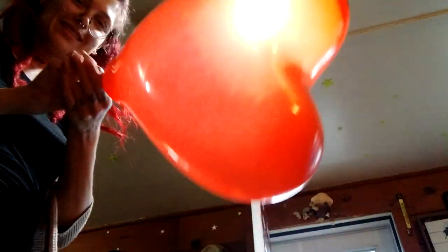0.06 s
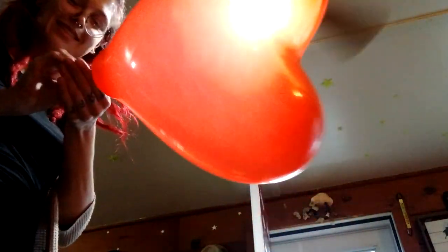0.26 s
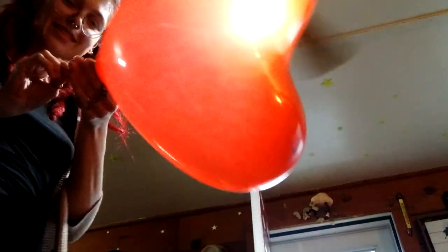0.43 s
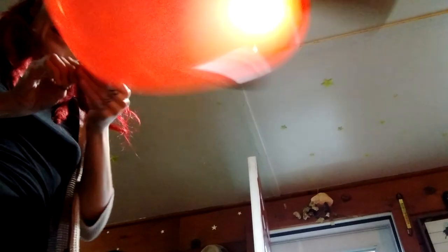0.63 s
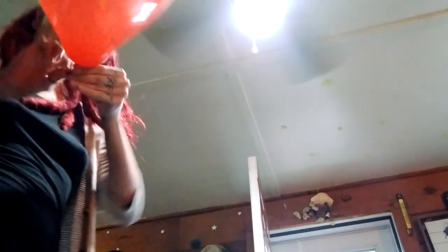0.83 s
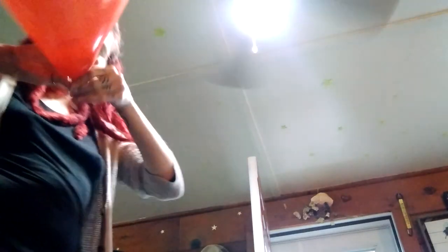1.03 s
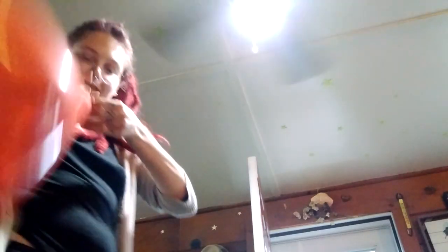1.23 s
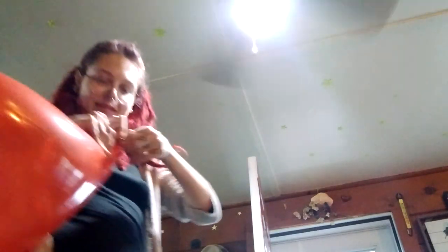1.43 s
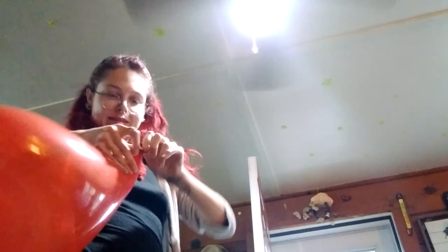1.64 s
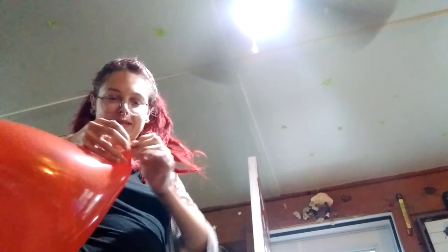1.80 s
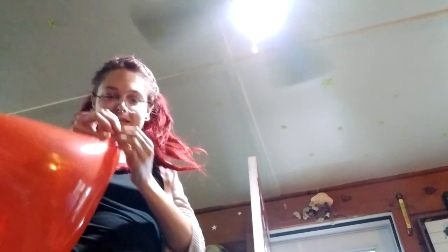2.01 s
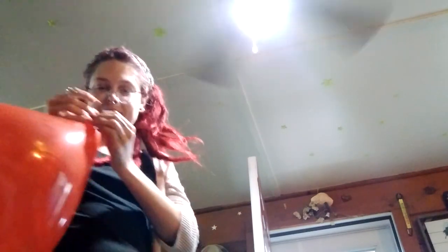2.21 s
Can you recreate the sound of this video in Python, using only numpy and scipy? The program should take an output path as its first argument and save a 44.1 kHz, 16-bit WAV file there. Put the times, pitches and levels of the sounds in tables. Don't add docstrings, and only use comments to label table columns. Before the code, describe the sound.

Close, dry balloon handling: an early squeak, quiet scrapes and a puff of leaking air, soft low thuds with a bright snap midway, then crackling rubber creaks and thin whines, over a very faint fan hum.

```python
import sys
import numpy as np
from scipy import signal
from scipy.fft import rfft, irfft, next_fast_len
from scipy.io import wavfile

SR = 44100
rng = np.random.default_rng(int(sys.argv[2]) if len(sys.argv) > 2 else 0)


def inscribe(sig):
    pcm = np.round(np.clip(np.atleast_2d(sig).T, -1, 1) * 32767)
    wavfile.write(sys.argv[1], SR, pcm.astype(np.int16))


def makeup_ratio(level_db):
    decades = np.asarray(level_db, float) / 20
    return 10 ** decades


N = 99754


def rms_one(x):
    return x / np.sqrt(np.mean(x ** 2) + 1e-20)


def drift(rate):
    r = np.exp(-80 * np.pi * rate / SR)
    points = rng.standard_normal(N // 40 + 1002)
    slow = signal.lfilter([1], [1, -2 * r, r * r], points)[1000:]
    return np.interp(np.arange(N) / 40, np.arange(len(slow)), rms_one(slow))


def stroke(start, rise, hold, db, fall):
    t = np.arange(N) / SR - start
    swell = np.clip(t / max(rise, 1e-4), 0, 1) ** 2
    return swell * makeup_ratio(db - fall * np.clip(t - rise - hold, 0, 1))


def band_pass(x, low, high):
    return signal.sosfilt(signal.butter(2, [low, high], "band", fs=SR, output="sos"), x)


def resonate(x, hz, width_hz):
    r = np.exp(-np.pi * width_hz / SR)
    top = [(1 - r * r) / 2, 0, (r * r - 1) / 2]
    bottom = [1, -2 * r * np.cos(2 * np.pi * hz / SR), r * r]
    return signal.lfilter(top, bottom, x + 1e-18)


def body(x):
    # (f/Hz, width/Hz, level/dB)
    modes = [(242.3, 42.5, 1.5), (496, 106, 5.5), (715, 440, -9), (1110, 73, 0.5), (1332, 310, -7.5),
             (2000, 530, 2), (2588, 590, -3), (3960, 580, 3.5)]
    out = makeup_ratio(-9) * x
    for k, (hz, width_hz, db) in enumerate(modes):
        out = out + (-1) ** k * makeup_ratio(db) * resonate(x, hz, width_hz)
    return out


def coloured(spectrum, alike, patchy_db):
    out, white = 0, rng.standard_normal((2, 2, N))
    grain = makeup_ratio(6 * rng.standard_normal(N))
    hz, db = np.transpose(spectrum)
    edges = np.geomspace(hz[0], hz[-1] * 1.1, 14)
    for k, (low, high) in enumerate(zip(edges, edges[1:])):
        mid, side = band_pass(grain * white[k % 2], low, high)
        band_db = np.interp(np.log(low * high) / 2, np.log(hz), db)
        gain = makeup_ratio(band_db + patchy_db * drift(26.4))
        out = out + gain * (np.sqrt(1 + alike) * mid + np.sqrt(1 - alike) * side * [[1], [-1]])
    return rms_one(out)


def hiss(strokes, colour):
    loudness = np.sqrt(sum(stroke(*row) ** 2 for row in strokes))
    return loudness * coloured(colour, 0.057, 2)


def tone(path, orders, wobble, flutter_db):
    s, hz, db = np.transpose(path)
    t = np.arange(N) / SR
    pitch = np.interp(t, s, hz) * (1 + wobble * drift(60))
    phase = 2 * np.pi * np.cumsum(pitch) / SR
    edge = np.clip(np.minimum(t - s[0], s[-1] - t) / 0.0011, 0, 1)
    stack = 0
    for k, order_db in orders:
        flutter = flutter_db * np.sqrt(k) * drift(50)
        stack = stack + makeup_ratio(order_db + flutter) * np.sin(k * phase + k * k)
    return np.sqrt(2) * edge * makeup_ratio(np.interp(t, s, db)) * stack


def background():
    # (f/Hz, level/dB per Hz)
    floor = [(25, -15), (60, -3.5), (200, -10), (520, -13), (1400, -18.5), (4000, -42), (9500, -22),
             (16000, -23)]
    hum_hz, hum_db = 120, -80.5
    t = np.arange(N) / SR
    hum = makeup_ratio(hum_db + 1.5 * drift(2.9)) * np.sin(2 * np.pi * hum_hz * t + 0.5 * drift(12))
    return makeup_ratio(-80.5) * coloured(floor, 0.34, 1.5) + np.sqrt(2) * hum


def squeak():
    # (t/s, f/Hz, level/dB)
    path = [
        (.058, 399.7, -56.5),
        (.066, 408.8, -50),
        (.074, 349, -51),
        (.085, 358, -47.5),
        (.1, 371.4, -39.5),
        (.124, 370.7, -40),
        (.141, 352, -40),
        (.15, 337.5, -50),
        (.2, 316, -69),
    ]
    # (multiple, level/dB)
    orders = [(1, -3), (2, -16.5), (3, -23.5), (4, -16.5), (5, -26), (6, -29.5), (7, -26), (8, -35),
              (9, -37), (10, -54)]
    return tone(path, orders, wobble=.006, flutter_db=1.2)


def rubs():
    # (start/s, hold/s, level/dB, centre f/Hz, spread/octaves)
    rough = [(0.074, 0.035, -54, 1290, 1), (0.135, 0.012, -52.5, 524, 1.2),
             (0.308, 0.03, -73.5, 1400, 0.44), (0.378, 0.021, -66, 1490, 0.32),
             (0.523, 0.027, -66, 1750, 0.36), (0.559, 0.0017, -55, 1390, 1.9),
             (0.577, 0.077, -53.5, 790, 0.69), (.7, 0.027, -67.5, 870, 0.5), (0.872, 0.026, -54, 477, 1.62),
             (1.004, 0.074, -68, 433, 1.2), (1.082, 0.048, -54, 1850, 1.46),
             (1.165, 0.019, -61, 1170, 1.46), (1.266, 0.013, -48.5, 2560, 1.06),
             (1.279, 0.0045, -50.5, 890, 0.31), (1.291, 0.05, -54, 234, 1),
             (1.294, 0.041, -54.5, 1190, 0.83), (1.347, 0.032, -54, 750, 0.89),
             (1.427, 0.033, -76.5, 985, 0.63), (1.486, 0.033, -62.5, 427, 0.62),
             (1.53, 0.002, -53, 980, 1.13), (1.544, 0.023, -57.5, 696, 0.97),
             (1.665, 0.0098, -55.5, 2000, 0.64), (1.813, 0.014, -46, 1280, 0.7),
             (1.923, 0.058, -46, 1130, 1.34), (1.995, 0.022, -50.5, 860, 0.47),
             (2.063, 0.018, -47.5, 2110, 1.14), (2.102, 0.035, -60, 790, 1.3),
             (2.14, 0.074, -58.5, 750, 1.7), (2.175, 0.0052, -55.5, 825, 1.47)]
    attack_s, fall_db_per_s, longest_s = .007, 500, .3
    slips_per_s, jitter, size_spread_db = 240, .3, 3
    grip_db = -41
    out, scrape = np.zeros(N), .45 * rng.standard_normal(N)
    for s, hold, db, hz, octaves in rough:
        waits = np.exp(jitter * rng.standard_normal(200)) / slips_per_s
        times = s + attack_s + np.cumsum(waits) - waits[0]
        at = (times * SR).astype(int)
        at = at[at < (s + longest_s) * SR]
        sizes = rms_one(makeup_ratio(size_spread_db * rng.standard_normal(len(at))))
        slips = scrape * makeup_ratio(max(grip_db - db, 0))
        slips[:int(s * SR)] = 0
        slips[int((s + longest_s) * SR):] = 0
        inside = at < N
        slips[at[inside]] += np.sqrt(SR / slips_per_s) * sizes[inside]
        low, high = hz / 2 ** octaves, min(hz * 2 ** octaves, SR / 3)
        patch = band_pass(slips, low, high + 10)
        out += rms_one(patch) * stroke(s, attack_s, hold, db - 8.5, fall_db_per_s)
    return body(out)


def slides():
    # (start/s, rise/s, hold/s, level/dB, fall/dB per s)
    glides = [(0.135, 0.023, 0.028, -58.5, 316), (.311, 0.0043, 0.01, -63, 198),
              (.34, 0.033, 0.032, -63.5, 248), (.722, 0.013, 0.0015, -61.5, 703),
              (0.867, 0.023, 0.0026, -50.5, 264), (.997, 0.0049, 0.0043, -56, 216),
              (1.037, 0.0096, 0.14, -61, 233), (1.106, 0.0028, 0.015, -43.5, 259),
              (1.254, 0.033, 0.12, -50.5, 83), (1.504, 0.005, 0.093, -54.5, 216),
              (1.664, 0.0046, 0.0023, -48.5, 277), (1.799, 0.038, 0.084, -54, 211),
              (1.913, 0.063, 0.076, -46.5, 81), (2.084, 0.04, 0.081, -52.5, 356)]
    # (f/Hz, level/dB per Hz)
    colour = [(2000, -9.5), (4500, -12.5), (6500, -2), (8500, 1), (10000, 5), (11500, -6), (13000, -10),
              (16000, -10.5)]
    return hiss(glides, colour)


def snaps():
    # (t/s, peak level/dB)
    bursts = [(.177, -45), (.892, -41), (.998, -55), (1.1102, -20.5), (1.1138, -27), (1.278, -42),
              (1.343, -36), (1.508, -46), (1.527, -46), (1.671, -44), (2.216, -44)]
    size = 400
    x, t = np.zeros(N + size), np.arange(size) / SR
    for s, db in bursts:
        burst = rng.standard_normal(size) * np.exp(-t / 0.0011)
        at = int(s * SR)
        x[at:at + size] += makeup_ratio(db + 8) * rms_one(burst) / 4
    return resonate(x[:N], 10200, 1270)


def leaks():
    # (start/s, rise/s, hold/s, level/dB, fall/dB per s)
    puffs = [
        (.501, 0.0063, 0.039, -51.5, 203),
        (.52, 0.029, 0.07, -46.5, 225),
    ]
    # (f/Hz, level/dB per Hz)
    colour = [(2500, -48), (5000, -38), (7000, -24), (8500, -9), (10000, 0), (11500, -9), (13500, -17),
              (16000, -21)]
    return hiss(puffs, colour)


def bumps():
    # (t/s, level/dB, f/Hz, time to fall 60 dB/s)
    pushes = [
        (0.512, -71.5, 55.5, 0.18),
        (0.882, -35, 76, 0.025),
        (0.898, -60.5, 46.2, 0.34),
        (0.928, -57.5, 120, 0.084),
        (1.017, -55, 68, 0.15),
        (1.033, -55.5, 70.6, 0.27),
        (1.285, -55.5, 113, 0.2),
        (1.296, -52.5, 51, 0.27),
        (1.334, -57, 72, 0.12),
        (1.37, -65, 42, 0.14),
    ]
    out, t = np.zeros(N), np.arange(N) / SR
    for s, db, hz, t60 in pushes:
        u = np.clip(t - s, 0, 9)
        soft_start = 1 - np.exp(-u / .005)
        out += makeup_ratio(db - 60 * u / t60) * soft_start * np.sin(2 * np.pi * hz * u) * 2
    return out


def gushes():
    # (start/s, rise/s, hold/s, level/dB, fall/dB per s)
    puffs = [
        (.53, 0.036, 0.069, -50, 227),
    ]
    # (f/Hz, level/dB per Hz)
    colour = [(2500, -17), (5000, -14), (7500, -9.5), (10000, -10), (12000, -2), (14000, -5.5),
              (16000, -10)]
    return hiss(puffs, colour)


def plucks():
    # (t/s, peak level/dB, f/Hz, time to fall 60 dB/s)
    single = [(.565, -47, 850, .04), (1.105, -53, 970, .05), (.891, -47, 1250, .07),
              (1.2815, -39, 1600, .02), (.884, -49, 1280, .04), (1.283, -45, 800, .035),
              (1.528, -39, 1050, .025), (1.824, -44, 1390, .06), (2.178, -43, 320, .03),
              (2.072, -50, 1200, .1)]
    out, t = np.zeros(N), np.arange(N) / SR
    for s, db, hz, t60 in single:
        u = np.clip(t - s, 0, 1)
        soft_start = 1 - np.exp(-u / .0001)
        pair = np.sin(2 * np.pi * hz * u) + .5 * np.sin(2 * np.pi * 1.33 * hz * u)
        out += makeup_ratio(db - 60 * u / t60) * soft_start * pair
    low_cut = signal.butter(2, 160, "high", fs=SR, output="sos")
    return signal.sosfilt(low_cut, out)


def cracks():
    # (t/s, peak level/dB, centre f/Hz)
    strong = [(0.5657, -38, 1320), (0.5679, -42, 770), (0.571, -39, 640), (0.6504, -41, 530),
              (0.891, -41, 700), (1.1044, -48, 1120), (1.1081, -48, 1400), (1.2769, -49, 1770),
              (1.2804, -36, 1740), (1.3298, -50, 1080), (1.3423, -51, 1380), (1.5041, -43, 1110),
              (1.508, -41, 1850), (1.5151, -39, 650), (1.5261, -34, 1170), (1.5318, -40, 1000),
              (1.8168, -49, 1220), (1.8237, -39, 1220), (1.9254, -35, 990), (1.931, -33, 940),
              (1.9346, -31, 810), (1.9396, -29, 980), (1.9446, -32, 1090), (1.9515, -28, 950),
              (1.9566, -32, 730), (1.9607, -31, 1060), (1.9654, -32, 770), (1.9723, -28, 810),
              (1.9772, -29, 650), (1.9843, -28, 590), (1.9877, -30, 980), (1.9933, -32, 660),
              (2.0026, -35, 990), (2.0705, -44, 2120), (2.178, -36, 490)]
    size, octaves = 2000, .95
    out, t = np.zeros(N + size), np.arange(size) / SR
    click = np.eye(1, size)[0]
    for s, db, hz in strong:
        ring = body(band_pass(click, hz / 2 ** octaves, hz * 2 ** octaves))
        edge = makeup_ratio(-13) * rng.standard_normal(size) * np.exp(-t / .0012)
        at = int((s + 5e-4) * SR) - np.abs(ring).argmax()
        out[at:at + size] += makeup_ratio(db + .5) * (ring / np.abs(ring).max() + edge)
    return out[:N]


def whines():
    # (t/s, f/Hz, level/dB)
    paths = [
        [(.62, 454, -69), (.646, 437.5, -53.5), (.672, 446, -63), (.688, 434, -53.5), (.715, 448, -59.5),
         (.742, 455, -62), (.752, 505, -76), (.79, 531, -85), (.85, 526, -99)],
        [(1.1, 470, -73), (1.124, 464, -62), (1.136, 480, -70), (1.146, 500, -65), (1.158, 460, -76),
         (1.175, 460, -66), (1.198, 457, -65), (1.21, 470, -76)],
        [(1.82, 590, -60), (1.828, 597, -51), (1.852, 680, -60), (1.872, 720, -63), (1.9, 800, -76)],
        [(1.93, 521.5, -70), (1.95, 521, -67), (1.99, 542, -43), (2.04, 530, -81)],
        [(1.925, 1400, -51), (1.94, 1370, -41), (1.965, 1395, -58), (1.975, 1522, -43), (1.99, 1500, -47)],
    ]
    orders = [(1, 0.47), (2, -26)]  # (multiple, dB)
    return sum(tone(path, orders, wobble=.03, flutter_db=3) for path in paths)


def room(x):
    t60_s, wall_cut_hz = 0.15, 27000
    size = next_fast_len(N + SR)
    w = 2 * np.pi * np.arange(size // 2 + 1) / size
    dull = 1 / (1 + 1j * w * SR / (2 * np.pi * wall_cut_hz))
    echoes = np.zeros((2, size // 2 + 1), complex)
    for k, lag in enumerate(rng.uniform(.005, .03, 16)):
        loop = makeup_ratio(-60 * lag / t60_s) * dull * np.exp(-1j * w * int(lag * SR))
        echoes[k % 2] += (-1) ** (k // 2) * loop / (1 - loop)
    return irfft(echoes * rfft(x, size), size)[:, :N]


def scene():
    left_lead_s, left_db = .00011, .6
    near = squeak() + rubs() + snaps() - bumps() + plucks() + cracks() + whines()
    right = np.interp(np.arange(N) - left_lead_s * SR, np.arange(N), near)
    airy = slides() + leaks() + gushes()
    direct = (np.array([near, right]) + airy) * makeup_ratio([[left_db], [-left_db]])
    return direct + makeup_ratio(-10.5) * room(near) + background()


def roll_off(x):
    return signal.sosfilt(signal.butter(12, 15870, fs=SR, output="sos"), x)


def record(dry):
    top_cut = signal.cheby2(12, 70, 16600, fs=SR, output="sos")
    mix = signal.sosfilt(top_cut, dry)
    return roll_off(mix)


dry = scene()
out = record(dry)
inscribe(out)
```